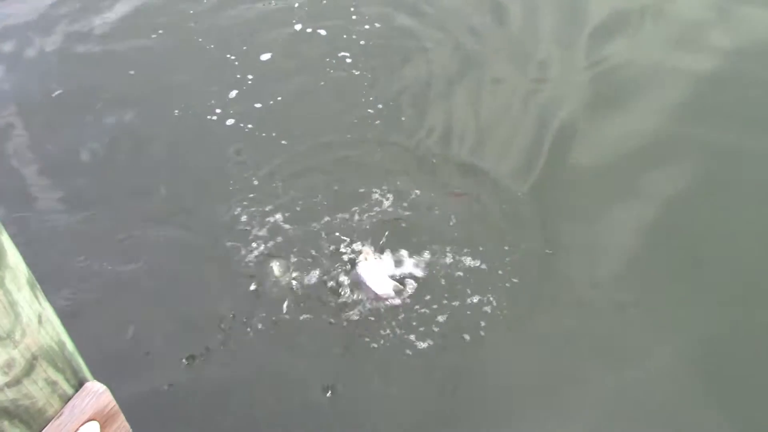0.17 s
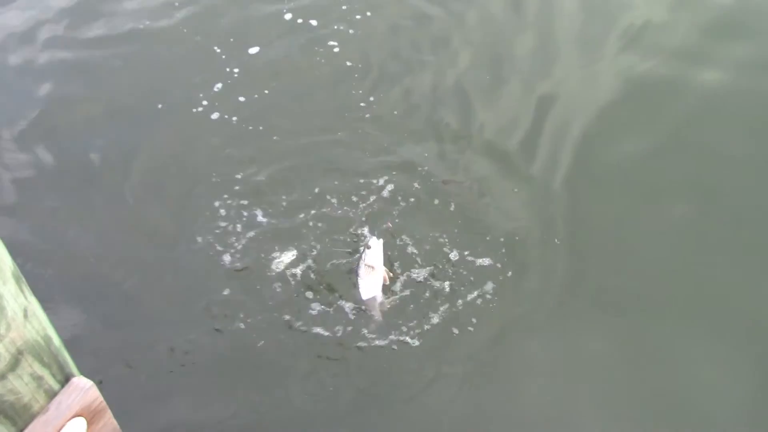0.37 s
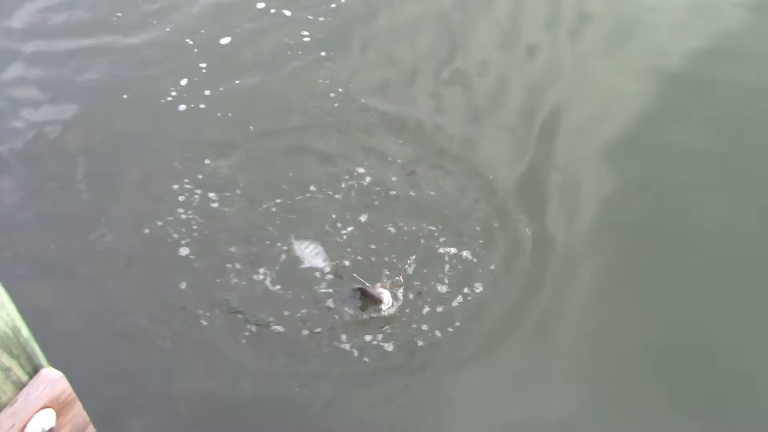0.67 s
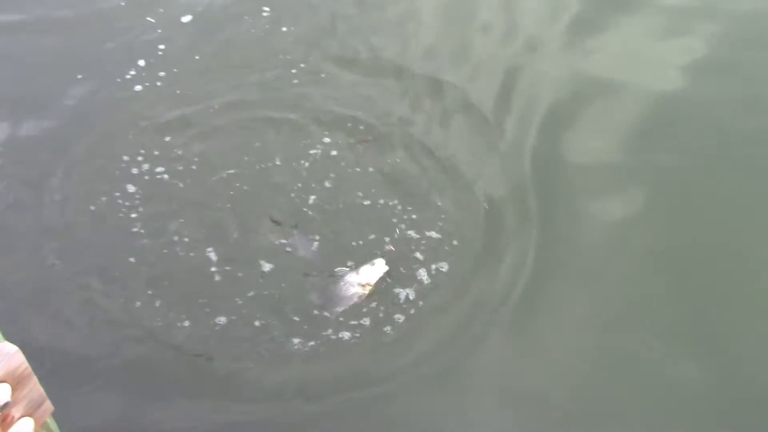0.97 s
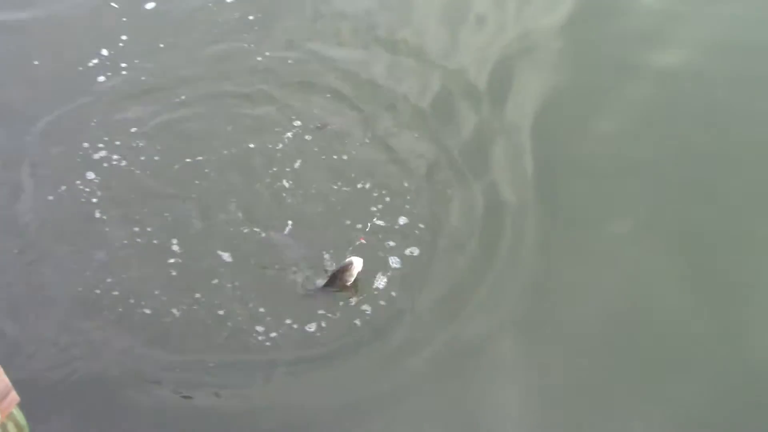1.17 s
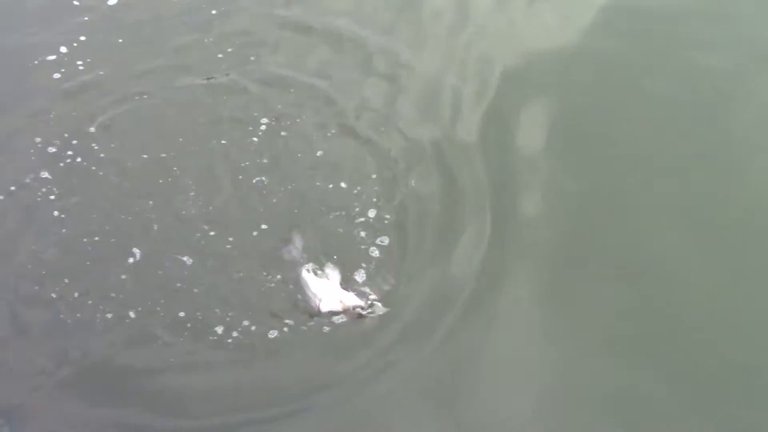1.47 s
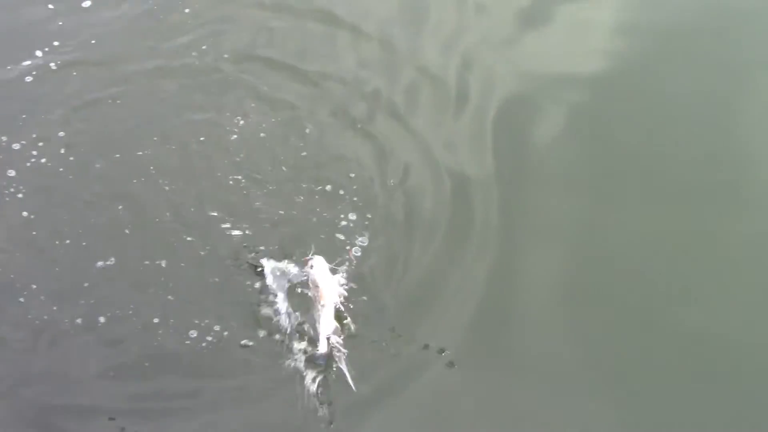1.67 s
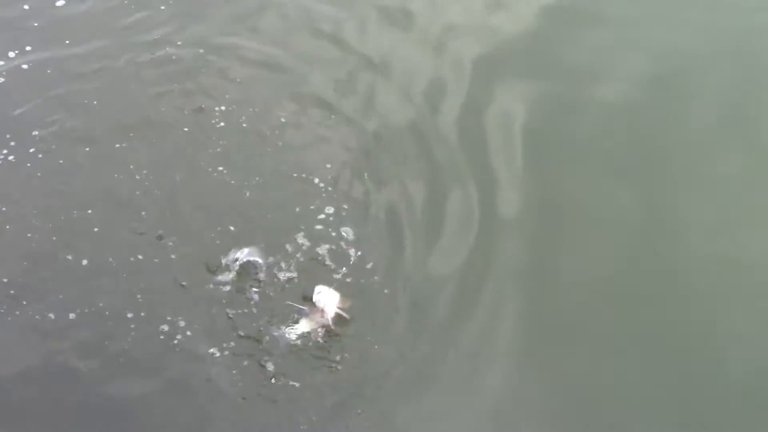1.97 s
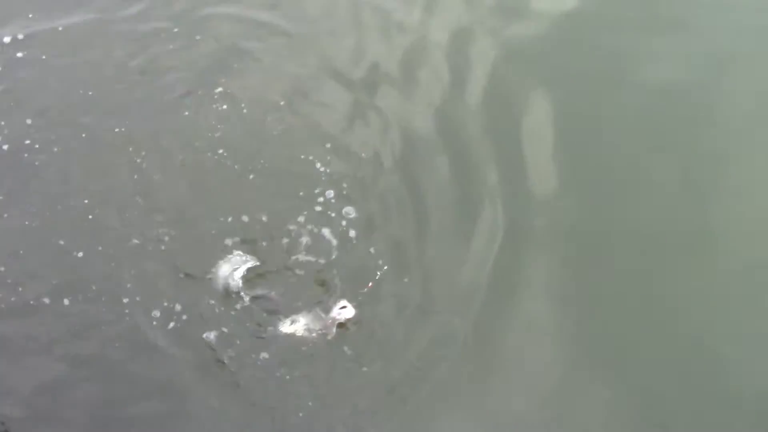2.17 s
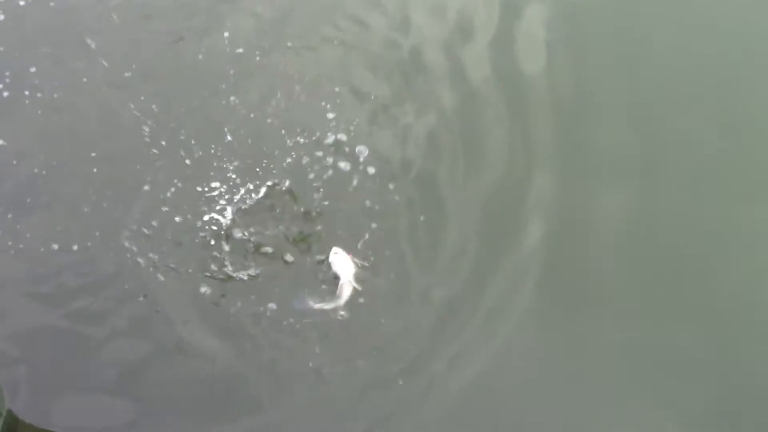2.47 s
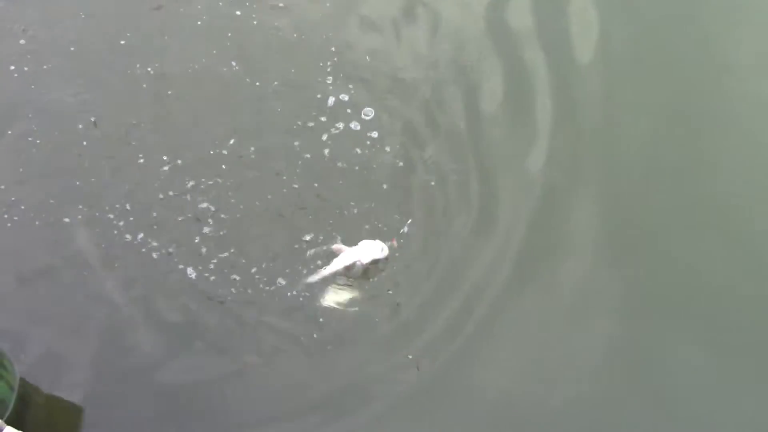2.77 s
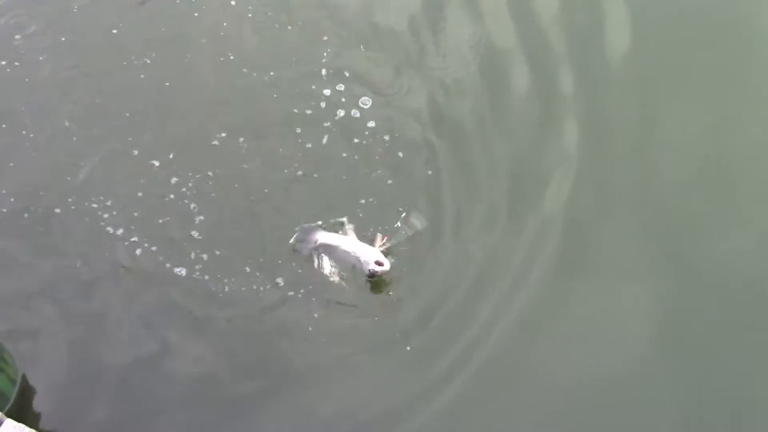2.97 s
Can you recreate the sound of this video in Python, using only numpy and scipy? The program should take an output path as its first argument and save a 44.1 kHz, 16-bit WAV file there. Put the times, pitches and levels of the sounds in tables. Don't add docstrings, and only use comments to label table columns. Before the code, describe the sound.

A fish thrashes at the water surface in three bouts of wet slaps, hissing spray, ticking drops and plopping bubbles, with one hard knock early, over steady far wash, outdoors, mono microphone a few metres away.

```python
import sys
import numpy as np
from scipy import signal
from scipy.fft import rfft, irfft
from scipy.io import wavfile

SR = 44100
rng = np.random.default_rng(int(sys.argv[2]) if len(sys.argv) > 2 else 0)


def gain_from_db(level_db):
    decades = np.asarray(level_db, float) / 20
    return 10 ** decades


def wav_out(sig):
    wavfile.write(sys.argv[1], SR, np.round(np.clip(np.atleast_2d(sig).T, -1, 1) * 32767).astype(np.int16))


N = 137151


def at_hz(points, hz):
    point_hz, point_db = np.transpose(points)
    return np.interp(np.log(hz), np.log(point_hz), point_db)


def rms_one(x):
    return x / np.sqrt(np.mean(x ** 2) + 1e-20)


def coloured(spectrum, x):
    hz = np.arange(N // 2 + 1) * SR / N + 1
    return irfft(rfft(x) * gain_from_db(at_hz(spectrum, hz)), N)


def drift(rate):
    knots = rng.standard_normal(400)
    return np.interp(np.arange(N) / SR * rate, np.arange(len(knots)), knots)


def ring(clicks, hz, t60):
    radius = gain_from_db(-60 / (t60 * SR))
    angle = 2 * np.pi * hz / SR
    poles = [1, -2 * radius * np.cos(angle), radius * radius]
    return signal.lfilter([0, np.sin(angle)], poles, clicks + 1e-18)


def add(out, s, piece):
    i = int(s * SR)
    out[i:i + len(piece)] += piece[:N - i]


# f/Hz, level/dB per Hz
WASH_COLOUR = [(95, -28), (140, -18), (750, 0.5), (1080, -3.5), (1430, -2.5), (1620, -9.5), (4800, -35.5),
               (10500, -38)]
# t/s, level/dB
WASH_SWELL = [
    (0.0, -33.5),
    (0.94, -35),
    (3.11, -34.5),
]
WASH_FLICKER_DB = 1.14


def wash():
    s, db = np.transpose(WASH_SWELL)
    noise = rms_one(coloured(WASH_COLOUR + [(15500, -47.5)], rng.standard_normal(N)))
    low = signal.sosfilt(signal.butter(2, 900, fs=SR, output="sos"), noise)
    high = noise - low
    flickering = low * gain_from_db(WASH_FLICKER_DB * drift(14)) + high * gain_from_db(WASH_FLICKER_DB * drift(20))
    return gain_from_db(np.interp(np.arange(N) / SR, s, db)) * flickering


# t/s, level/dB
RAIL_TAPS = [
    (.35568, -13.8),
    (.35629, -7.2),
    (.3591, -24.8),
    (.36319, -26.6),
]
# f/Hz, level/dB, t60/s
RAIL_MODES = [(610, -14, .04), (1160, 4.8, 0.0027), (1470, -1.5, 0.014), (1830, 3, .0121),
              (2684, -2, 0.019), (3402, 0.5, .0148), (4030, 3.5, 0.0079), (4450, -8.4, 0.018),
              (4180, -4, .001), (5570, -7.5, 0.011), (6330, -4, .005), (7900, -12, 0.0081),
              (10250, -11, 0.0084), (12400, -4, .006)]


def knock():
    clicks = np.zeros(N)
    for s, db in RAIL_TAPS:
        clicks[int(s * SR)] = gain_from_db(db)
    clicks = signal.sosfilt(signal.butter(2, [500, 9000], "band", fs=SR, output="sos"), clicks)
    out = np.zeros(N)
    for k, (hz, db, t60) in enumerate(RAIL_MODES):
        out += ring(clicks * gain_from_db(db) * (-1) ** k, hz, t60)
    return out


# t/s, peak level/dB, f/Hz
FALLING_DROPS = [(0.0136, -25, 6770), (0.0365, -31, 7750), (0.0478, -35, 4860), (0.0857, -25, 8000),
                 (0.1082, -39, 7340), (0.1331, -30, 4000), (0.1456, -25, 5900), (0.2109, -35, 7510),
                 (0.2389, -33, 6200), (0.2588, -44, 8610), (0.4691, -35, 6200), (0.489, -34, 5900),
                 (0.7282, -37.5, 6100), (1.3728, -39, 6540), (1.744, -41, 9500), (1.4418, -36, 4110),
                 (1.5074, -22.5, 6700), (1.5384, -30, 9220), (1.564, -21, 7850), (1.609, -31, 9300),
                     (1.6407, -37, 7490), (1.6601, -20, 9300), (1.6841, -33, 8000), (1.701, -30, 6530),
                     (1.739, -33, 3940), (1.7907, -22.5, 8700), (1.8144, -20.5, 8500), (1.8218, -23, 6230),
                     (1.8536, -26, 8000), (1.924, -37, 7240), (1.949, -36, 6700), (1.9729, -36, 5800),
                     (2.0124, -37, 6490), (2.032, -29, 6980), (2.0624, -37, 5480), (2.0844, -23.5, 9100),
                     (2.0954, -29, 7000), (2.1026, -31, 7000), (2.1174, -32, 4070), (2.1673, -30, 8100),
                 (2.2203, -36, 4830), (2.2416, -27, 5680), (2.2527, -21, 8900), (2.292, -24, 7950),
                    (2.3, -12.5, 9000), (2.329, -27, 6840), (2.427, -42, 4600), (2.45, -35, 11000),
                    (2.4942, -38, 4370), (2.5052, -31, 5750), (2.5401, -24, 8750), (2.59, -37, 6110),
                    (2.62, -29, 4270), (2.885, -38, 8100), (3.022, -36.5, 7600), (3.0545, -45, 5750),
                    (3.0674, -51, 7000), (3.0799, -32, 8100), (3.0914, -40, 8750),
                 (0.057, -29, 4840), (.148, -37, 13870), (.1494, -38, 8570), (0.1746, -36, 4400),
                 (.2299, -31, 8960), (.2401, -30, 8740), (0.5867, -36, 10470), (0.684, -41, 8170),
                 (1.5028, -22, 6560), (1.5121, -35, 6370), (1.557, -31, 6200), (1.5673, -26, 8100),
                 (1.5707, -29, 6930), (1.5767, -40, 13310), (1.6427, -34, 14900), (1.6558, -37, 4610),
                 (1.6616, -30, 4520), (1.664, -30, 5400), (1.7247, -35, 5800), (1.7516, -37, 6800),
                 (1.7792, -34, 5810), (1.7828, -32, 11020), (1.7863, -21, 9780), (1.8147, -30, 13950),
                 (1.8355, -30, 6370), (1.8826, -43, 8320), (1.9823, -38, 12580), (2.046, -41, 5500),
                 (2.068, -40, 9000), (2.1075, -36, 10000), (2.112, -34, 4910), (2.146, -44, 10500),
                 (2.174, -40, 9000), (2.1768, -42, 13050), (2.3023, -35, 5800), (2.3089, -35, 6240),
                 (2.3096, -34, 7880), (2.363, -41, 7500), (2.4084, -44, 8640), (2.4271, -28, 10800),
                 (2.536, -44, 14340)]
DROP_RING_CYCLES, DROP_RING_DB = 25.7, 7
DROP_CRACK_S, DROP_CRACK_DB = 0.0005, -3


def drops():
    out, t = np.zeros(N), np.arange(300) / SR
    rows = FALLING_DROPS
    bursts = rng.standard_normal((len(rows), len(t))) * np.exp(-t / DROP_CRACK_S)
    cracks = signal.sosfilt(signal.butter(2, [2000, 13000], "band", fs=SR, output="sos"), bursts)
    for (s, db, hz), crack in zip(rows, cracks):
        fade = gain_from_db(-60 * t * hz / DROP_RING_CYCLES) * (1 - np.exp(-t * hz / 2))
        tone = np.sin(2 * np.pi * hz * t * (1 + 0.0011 * hz * t))
        add(out, s, gain_from_db(db) * (gain_from_db(DROP_RING_DB) * fade * tone + gain_from_db(DROP_CRACK_DB) * crack))
    return out


# t/s, peak level/dB, f/Hz, length/s, glide/octaves
AIR_POCKETS = [(.076, -15.5, 1457, 0.018, -0.56), (.163, -23.5, 1660, 0.0069, 0.031),
               (.2135, -19, 1090, 0.017, 0.03), (0.212, -26.5, 356, 0.044, 0.01),
               (0.232, -21.5, 1380, 0.0077, 0.078), (.252, -28.5, 500, 0.019, 0.22),
               (.598, -26.5, 617, 0.02, -0.046), (.742, -26, 885, 0.028, 0.2),
               (1.519, -26, 820, 0.016, 0.74), (1.561, -20, 590, 0.018, 0.087),
               (1.562, -23, 1534, .018, 0.075), (1.563, -27.5, 1206, 0.019, -0.15),
               (2.428, -27, 593, 0.031, 0.12), (1.636, -25.5, 394, 0.028, 0.51),
               (1.771, -27.5, 610, 0.025, 0.22), (1.857, -27, 910, 0.044, 1.3),
               (1.974, -35.5, 244, 0.025, 0.97), (2.104, -24.5, 1310, 0.0063, 0.49),
               (2.283, -23, 755, 0.028, 0.13), (2.33, -1, 1200, 0.0024, 0.09),
               (2.389, -24.5, 564, 0.023, -0.1), (2.658, -27, 600, 0.029, 0.029),
               (2.805, -27, 557, 0.033, 0.14), (2.805, -25, 878, 0.013, .05), (2.661, -30, 816, .016, 0.32),
               (2.817, -24, 870, 0.021, 0.095), (2.881, -23, 780, 0.011, .05)]
# t/s, peak level/dB, f/Hz
SMALL_BUBBLES = [(.048, -25.5, 4880), (0.2395, -29.5, 3320), (1.516, -26, 1720), (1.582, -23, 2150),
                 (1.583, -25, 1600), (1.685, -29.5, 3620), (1.8162, -28, 3350), (1.841, -31, 3100),
                 (2.026, -30, 2880), (2.184, -34, 2880), (2.289, -19.5, 1700), (2.292, -21.5, 2190),
                 (2.31, -24, 1700), (2.435, -32.5, 4500), (2.51, -27, 3180), (2.582, -26.5, 1800),
                 (2.622, -23, 1775), (2.933, -25, 1370), (.0132, -36, 3660), (0.044, -38, 2770),
                 (.103, -27, 1790), (0.146, -30, 1700), (.146, -40, 4000), (1.543, -33, 2300),
                 (1.631, -27, 1820), (1.6568, -37, 2760), (1.6996, -35, 2700), (1.836, -30, 1780),
                 (1.9956, -40, 4010), (2.2561, -38, 3340), (2.2881, -34, 4000), (2.3127, -27, 2640),
                 (2.3296, -32.5, 2680), (2.345, -36, 4200), (2.431, -36, 2860), (2.4571, -35, 2960),
                 (2.5014, -38, 3470), (2.934, -32, 1780), (3.066, -36.5, 3300), (3.074, -30.5, 1920),
                 (3.092, -39, 3000), (1.512, -31.5, 2630), (1.704, -34, 2230), (1.873, -28.5, 1700),
                 (2.066, -40, 2200), (2.631, -33.5, 2370), (2.367, -43, 4480)]
BUBBLE_CYCLES, BUBBLE_GLIDE_OCTAVES = 16, 0.093
ONSET_CYCLES = 0.46
WOBBLE_DB, WOBBLE_OCTAVES = 3, 0.041
WET_DB = -10.5


def bubbles():
    out = np.zeros(N)
    small = [row + (BUBBLE_CYCLES / row[-1], BUBBLE_GLIDE_OCTAVES) for row in SMALL_BUBBLES]
    rows = AIR_POCKETS + small
    for (s, db, hz, length, glide), chance in zip(rows, rng.standard_normal((len(rows), 4000))):
        u = np.arange(int(2 * length * SR)) / SR / length
        cycles = u * length * hz
        knots = np.arange(2000)
        pitch_sway = np.interp(cycles / 4, knots, chance[::2])
        level_shake = np.interp(cycles / 4, knots, chance[1::2])
        phase = 2 * np.pi * np.cumsum(hz * 2 ** (glide * u + WOBBLE_OCTAVES * pitch_sway)) / SR
        tone = gain_from_db(WOBBLE_DB * level_shake) * np.exp(-u - 2 * u ** 4) * np.sin(phase)
        wet = rms_one(ring(chance[:len(u)], 1.44 * hz, 9.2 / hz)) * np.exp(-u / 0.31)
        onset = (1 - np.exp(-cycles / ONSET_CYCLES)) ** 2
        add(out, s, gain_from_db(db) * onset * (tone + gain_from_db(WET_DB) * wet))
    return signal.sosfilt(signal.butter(2, 200, "high", fs=SR, output="sos"), out)


# peak t/s, level/dB, length/s
TAIL_SLAPS = [(0, -40, 0.046), (0.052, -35, 0.03), (0.09, -39, 0.098), (0.15, -33.5, 0.018),
              (0.173, -47, 0.034), (0.237, -42, 0.014), (0.277, -44.5, 0.051), (1.507, -37.5, 0.032),
              (1.53, -43.5, 0.018), (1.572, -34, 0.031), (1.612, -36.5, 0.014), (1.662, -33.5, 0.03),
              (1.714, -45.5, 0.082), (1.789, -42, 0.05), (1.824, -35.5, 0.017), (1.85, -53, 0.018),
              (2.032, -39, 0.016), (2.107, -37.5, 0.021), (2.253, -41, 0.036), (2.303, -31.5, 0.032),
              (2.34, -46, 0.028), (2.435, -41.5, 0.014), (2.51, -41.5, 0.033), (2.541, -46, 0.041),
              (2.626, -50, .02), (3.078, -45.5, 0.033)]
# f/Hz, level/dB per Hz
SPRAY_COLOUR = [(900, -21), (2000, 0), (3000, -1.5), (4800, -10), (7000, -6), (9500, -8), (12500, -20),
                (15500, -25)]
RISE_SHARE = 0.59
FOAM_DB, FOAM_S = -14.5, 0.14
IDLE_FIZZ_DB, HISS_DB = -59.5, -7.5
GRAINS_PER_S, GRAIN_SPREAD_DB = 5000, 4.5
GRAIN_CYCLES = [8.6, 18.0]


def spray():
    t = np.arange(N) / SR
    power = gain_from_db(IDLE_FIZZ_DB) ** 2
    for s, db, length in TAIL_SLAPS:
        u = (t - s) / length
        body = np.exp(-np.where(u < 0, (u / RISE_SHARE) ** 2, 2 * u) * 2)
        foam = gain_from_db(FOAM_DB) ** 2 * np.exp(-np.abs(t - s) / np.where(u < 0, length / 4, FOAM_S) * 2)
        power = power + gain_from_db(db) ** 2 * (body + foam)
    sizes = gain_from_db(GRAIN_SPREAD_DB * np.minimum(rng.exponential(1, N), 3.5)) * rng.choice([-1, 1], N)
    born = rng.random(N) < GRAINS_PER_S / SR
    dealt = rng.integers(0, 48, N)
    pitches = np.geomspace(1000, 15000, 48)
    t60s = np.resize(GRAIN_CYCLES, len(pitches)) / pitches
    grains = np.zeros(N)
    for k, (hz, t60) in enumerate(zip(pitches, t60s)):
        soft_onset = ring(ring(sizes * born * (dealt == k), hz, t60), hz, t60)
        grains += rms_one(soft_onset) * np.sqrt(hz) * gain_from_db(at_hz(SPRAY_COLOUR, hz))
    hiss = coloured(SPRAY_COLOUR, rng.standard_normal(N))
    return np.sqrt(power) * (rms_one(grains) + gain_from_db(HISS_DB) * rms_one(hiss))


def scene():
    return (wash() + knock() + drops() + bubbles() + spray())[None]


def roll_off(x):
    return signal.sosfilt(signal.butter(12, 16490, fs=SR, output="sos"), x)


def record(dry):
    overloaded = np.tanh(dry)
    thin = signal.sosfilt(signal.butter(2, 90, "high", fs=SR, output="sos"), overloaded)
    treble_limit = signal.ellip(10, 0.5, 60, 15800, fs=SR, output="sos")
    return roll_off(signal.sosfilt(treble_limit, thin))


dry = scene()
out = record(dry)
wav_out(out)
```